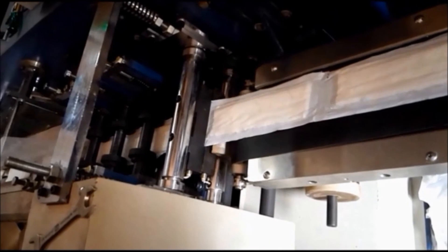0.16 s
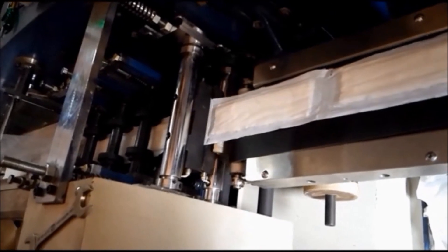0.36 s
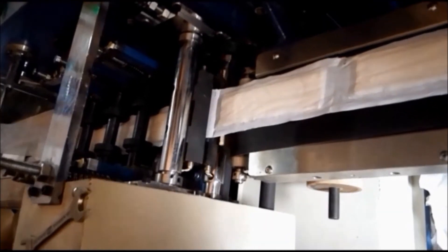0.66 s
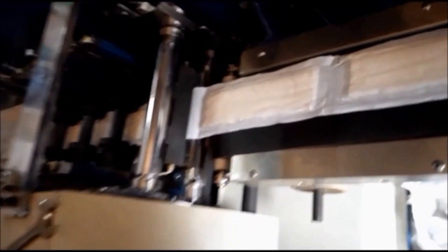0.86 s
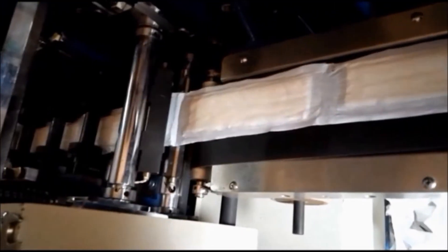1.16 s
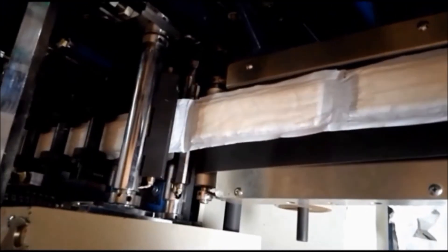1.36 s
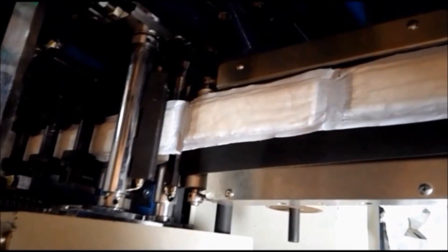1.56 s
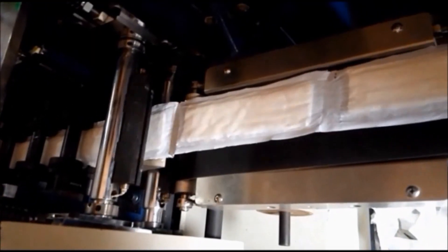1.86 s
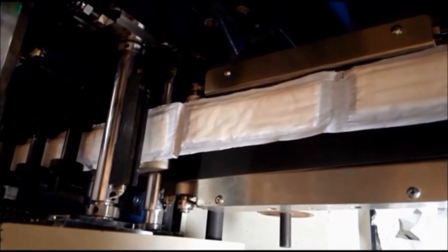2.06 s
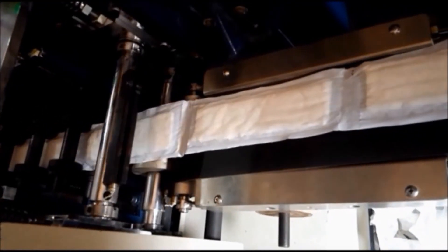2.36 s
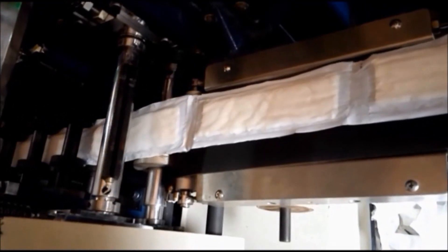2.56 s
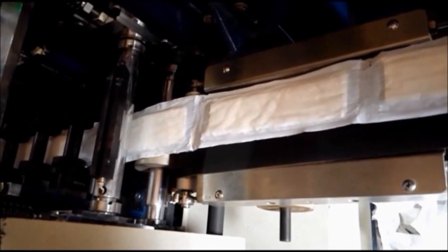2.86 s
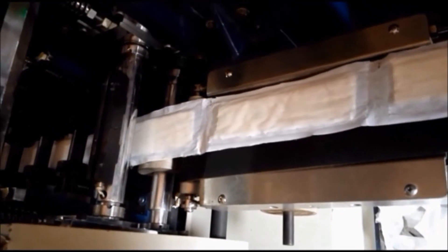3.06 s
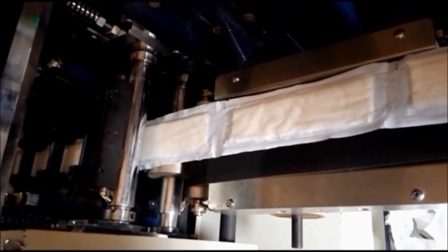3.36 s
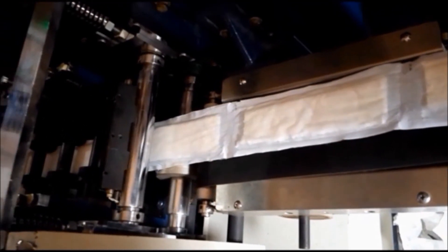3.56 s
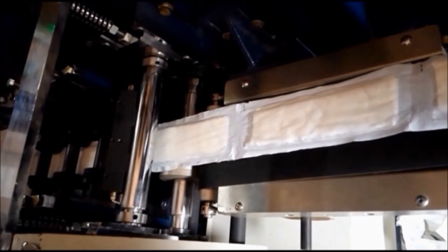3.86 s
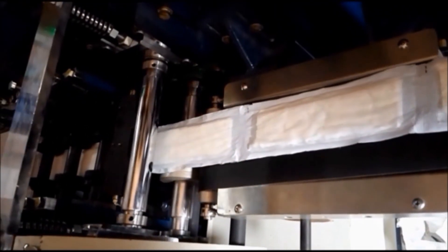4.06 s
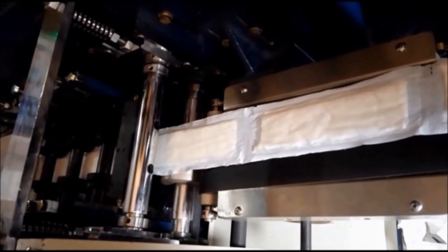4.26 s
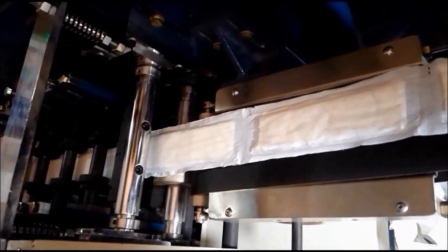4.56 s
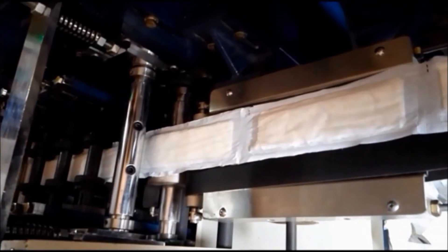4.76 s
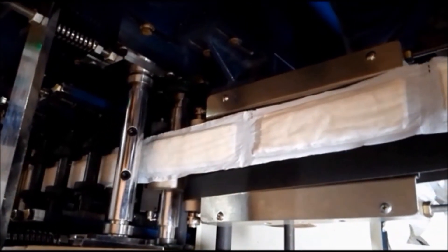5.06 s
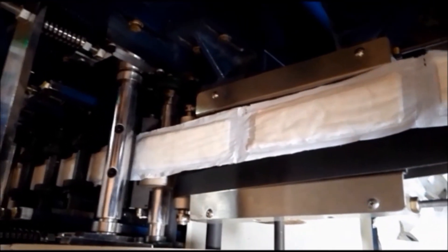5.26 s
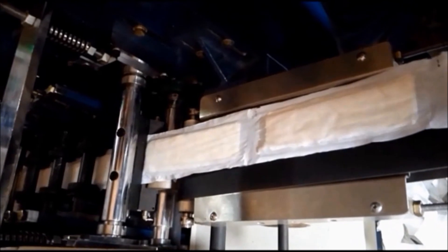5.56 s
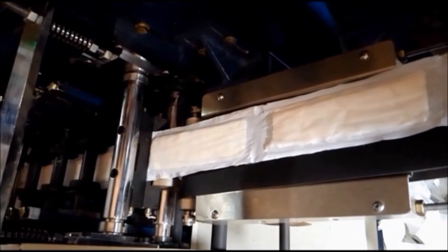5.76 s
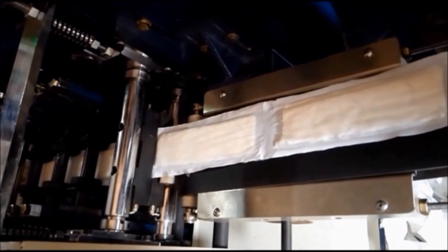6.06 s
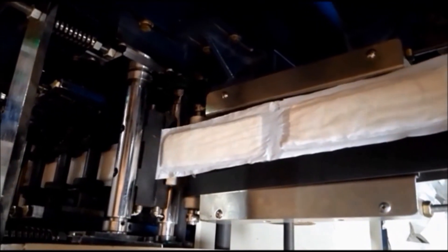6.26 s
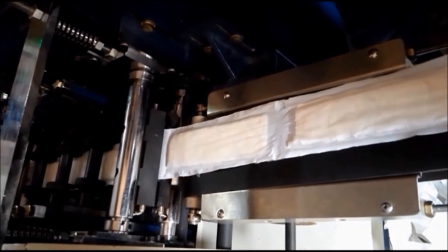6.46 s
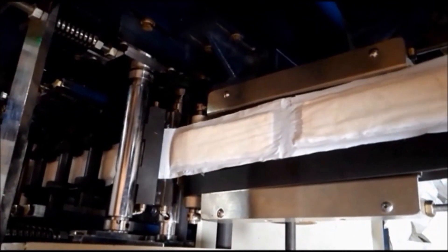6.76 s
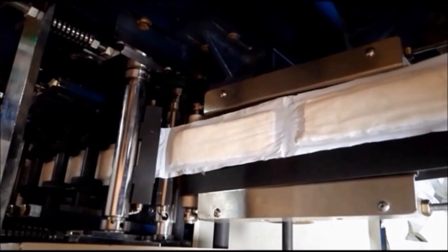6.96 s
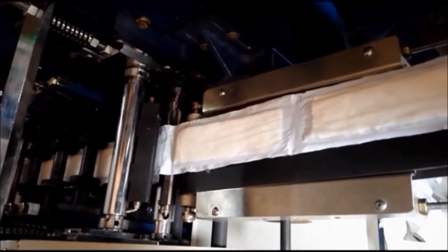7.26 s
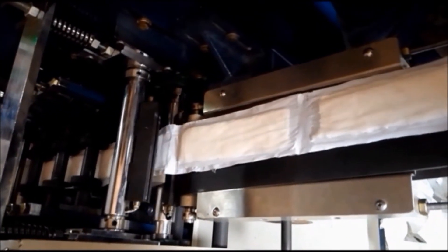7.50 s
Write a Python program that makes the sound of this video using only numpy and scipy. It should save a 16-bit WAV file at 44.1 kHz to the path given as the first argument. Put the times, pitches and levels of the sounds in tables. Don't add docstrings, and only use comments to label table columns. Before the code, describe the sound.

Loud, close pneumatic hisses ring off a steel frame in rhythm, above distant humming machinery and faint, thin bearing squeals.

```python
import sys
import numpy as np
from scipy import signal
from scipy.fft import rfft, irfft, next_fast_len
from scipy.io import wavfile
from scipy.ndimage import uniform_filter1d, map_coordinates

SR = 44100
rng = np.random.default_rng(int(sys.argv[2]) if len(sys.argv) > 2 else 0)


def ratio(d):
    e = np.asarray(d, float) / 20
    return 10 ** e


def bounce(signal):
    frames = np.transpose(np.atleast_2d(signal))
    limited = np.clip(frames, -1, 1)
    pcm = np.round(limited * 32767).astype(np.int16)
    wavfile.write(sys.argv[1], SR, pcm)


N = 336483


def unit(x):
    return x / np.sqrt(np.mean(x ** 2) + 1e-20)


def along(points, hz):
    f, v = np.transpose(points)
    return np.interp(np.log(hz + 1), np.log(f + 1), v)


def wobble(rate, size):
    knots = rng.standard_normal(int(size * rate / SR) + 4)
    return map_coordinates(knots, [np.arange(size) * rate / SR])


def noise(size, gain, channels=1):
    m = next_fast_len(size)
    spectrum = rfft(rng.standard_normal((channels, m)))
    return irfft(spectrum * gain(np.fft.rfftfreq(m, 1 / SR)), m)[:, :size]


def pair(size, gain, side):
    both = noise(size, lambda hz: gain(hz) * np.array([1 + 0 * hz, ratio(along(side, hz))]), channels=2)
    return both / np.std(both[0])


def wide(size, gain, side):
    mid, off = pair(size, gain, side)
    return np.array([mid + off, mid - off])


def patchy(x, patchy_db):
    z = signal.stft(x, nperseg=512)[2]
    field = uniform_filter1d(rng.standard_normal(z.shape[1:]), size=6, axis=0)
    field = uniform_filter1d(field, size=12, axis=1)
    return signal.istft(z * ratio(patchy_db * unit(field)), nperseg=512)[1][:, :x.shape[1]]


def echoes():
    # frequency in Hz, time to fall 60 dB in seconds
    room = [(150, 1.0), (500, 0.98), (1500, 0.86), (4000, 0.74), (9000, 0.56), (14000, 0.45)]
    # frequency in Hz, level in dB, time to fall 60 dB in seconds
    frame = [(320, -22, .4), (930, -17, .4), (3220, -22, .2), (3520, -23, .2), (5313, -16.5, .7),
             (5992, -19, .3), (7748, -17, .55), (8900, -20, .25), (9770, -20, .2), (10472, -13, .25),
             (10701, -15, .25), (11079, -19, .2)]
    hz, t, z = signal.stft(rng.standard_normal((2, SR)), SR, nperseg=256)
    decay = ratio(-60 * t / along(room, hz)[:, None])
    tail = signal.istft(z * decay, SR, nperseg=256)[1][:, :SR]
    t = np.arange(SR) / SR
    tail = tail * (1 - np.exp(-t / 0.0013))
    tail = tail / np.linalg.norm(tail[0])
    for mode_hz, db, t60 in frame:
        cycles = mode_hz * t + rng.random((2, 1))
        ring = ratio(-60 * t / t60) * np.sin(2 * np.pi * cycles + 1.2 * wobble(25, size=SR))
        port_db = db - 5 + rng.normal(0, 1.6, (2, 1))
        tail = tail + ratio(port_db) * ring / np.linalg.norm(ring[0])
    return tail


def valve():
    # start in seconds, hiss level in dB, extra edge near 4.5 kHz in dB,
    # time open in seconds, pressure loss in dB per second
    vents = [
        (-.2, -17, -3, 0.087, 52),
        (1.02, -12.5, 1, 0.06, 66),
        (1.638, -11, 1, 0.1, 64),
        (2.2727, -10, 5.5, 0.088, 72),
        (2.9389, -9.5, -1, 0.12, 46),
        (3.644, -8.5, 1.5, .12, 37),
        (4.2848, -8, 1, 0.12, 65),
        (4.931, -10, -1.5, 0.091, 26),
        (5.563, -10, 2, .11, 45),
        (6.4537, -14, 1.5, 0.16, 67),
    ]
    # frequency in Hz, level in dB per Hz
    jet_colour = [(60, -11), (170, -7.5), (320, -3), (480, -7.5), (900, 0.5), (1480, 3.5), (3100, -0.5),
                  (3900, -5), (5300, -2.5), (6600, -5), (7600, -1), (10900, 1), (11600, -6), (14200, -16.5)]
    # frequency in Hz, side minus mid in dB
    jet_side = [(60, -19), (200, -14), (370, -1), (670, 4), (1230, -3), (2300, 1.5), (4400, -1.5),
                (9000, -3), (14000, -4.5)]
    out = np.zeros((2, N + 3 * SR))
    t = np.arange(SR // 2) / SR
    upper = lambda hz: 1 / (1 + (3300 / (hz + 1)) ** 4)
    edge = lambda hz: np.exp(-(np.log((hz + 1) / 4500) / 0.92) ** 2)
    knot_hz = np.linspace(0, SR / 2, 60)
    for s, db, edge_db, open_s, loss_db in vents:
        body_db = -7.5 + 0.062 * loss_db
        uneven_db = rng.standard_normal(60)
        colour = lambda hz: ratio(along(jet_colour, hz) + edge_db * edge(hz) + np.interp(hz, knot_hz, uneven_db))
        shut = ratio(1.25 * wobble(38.6, size=len(t))) / (1 + np.exp(np.clip((t - open_s) / 0.059, -50, 50)))
        hiss = pair(len(t), lambda hz: colour(hz) * np.sqrt(upper(hz)), jet_side)
        hiss = hiss * ratio(-loss_db * t) * (1 - np.exp(-t / 0.0009))
        body = pair(len(t), lambda hz: colour(hz) * np.sqrt(1 - upper(hz)), jet_side)
        body = body * ratio(-0.8 * loss_db * t) * (1 - np.exp(-t / 0.01))
        jet = ratio(db) * shut * (hiss + ratio(body_db) * body)
        reflected = ratio(-4.5) * signal.fftconvolve(jet, echoes(), axes=1)
        direct = ratio(1.0) * np.pad(jet, ((0, 0), (0, SR - 1)))
        mid, side = reflected + direct
        out[:, SR + round(s * SR):][:, :len(mid)] += [mid + side, mid - side]
    return out[:, SR:SR + N]


def drone():
    # frequency in Hz, level in dB per Hz
    rumble = [(12, -33), (25, -6), (43, -6), (96, -3), (192, -5.5), (231, -5), (312, -2.5), (340, -6.5),
              (392, -7), (600, -22.5), (780, -48), (1320, -120)]
    # frequency in Hz, level in dB per Hz
    fan_hiss = [(240, -1.5), (400, -1.5), (520, -2), (700, -0.5), (950, 2.5), (1300, 3.5), (1900, 1),
                (3000, -3.5), (3900, -8), (10300, -9), (11400, -11), (11900, -16), (14200, -14),
                (14500, -60)]
    # frequency in Hz, side minus mid in dB
    drone_side = [(60, -27), (130, -16.5), (280, -9), (620, 4.5), (1340, -2.5), (2900, 1.5), (5000, -1),
                  (9000, -1), (14000, -1)]
    # frequency in Hz, width in Hz, level in dB re rumble
    motor = [(102.9, 6.1, -7), (243, 13, -16.5), (312.6, 10, -11.5)]
    # time in seconds, gain in dB
    slow_gain = [(0, 2), (.12, 1.5), (.95, 0.06), (2.2, 1.6), (2.9, -0.4), (4.25, -.3), (4.5, -5),
                 (7.63, -6)]
    carrier_hz, sway_hz = 12006.5, 17
    t = np.arange(N) / SR
    gain_db = np.interp(t, *np.transpose(slow_gain))
    low = patchy(wide(N, lambda hz: ratio(along(rumble, hz)), drone_side), patchy_db=0.4)
    for hum_hz, width_hz, db in motor:
        low = low + ratio(db) * unit(noise(N, lambda hz: 1 / (1 + (2 * (hz - hum_hz) / width_hz) ** 2)))
    high = patchy(wide(N, lambda hz: ratio(along(fan_hiss, hz)), drone_side), patchy_db=0.84)
    sway = 1.8 * np.sin(2 * np.pi * sway_hz * t)
    high = high + ratio(-17) * np.sin(2 * np.pi * carrier_hz * t + sway + np.array([[0], [1.4]]))
    low_db = -44 + gain_db + 0.45 * wobble(7.2, size=N)
    high_db = -36 + gain_db + 0.39 * wobble(11.0, size=N)
    return ratio(low_db) * low + ratio(high_db) * high


def squeals():
    # start in seconds, end in
    # seconds, row number in the table below, level in dB
    cries = [(2.57, 2.86, 0, -46), (3.35, 3.57, 0, -45.5), (4.95, 5.12, 1, -38.5), (5.1, 5.3, 1, -52),
             (2.66, 3.0, 2, -50), (3.1, 3.42, 2, -48.5), (4.5, 4.93, 2, -56), (2.75, 3.0, 4, -51),
             (3.28, 3.64, 3, -52), (3.96, 4.34, 3, -47), (5.2, 5.56, 3, -58), (5.8, 6.45, 3, -59.5)]
    # frequency in Hz,
    # left minus right in dB, third overtone in dB
    bearings = [(2095, 1, -60), (2390, 0, -60), (2882, 4, -60), (2965, 0, -10), (3330, 0, -60)]
    overtone_pan_db = 8
    out = np.zeros((2, N))
    sides = np.array([[.5], [-.5]])
    for start, end, bearing, db in cries:
        hz, pan_db, third_db = bearings[int(bearing)]
        size = int((end - start) * SR)
        phase = 2 * np.pi * np.cumsum(hz + 6 * wobble(27.7, size=size)) / SR
        level = ratio(db + 6 + 1.5 * wobble(18, size=size)) * signal.windows.tukey(size, .4)
        tone = np.sin(phase + sides) * ratio(pan_db * sides)
        third = np.sin(3 * phase + sides) * ratio(third_db + overtone_pan_db * sides)
        out[:, round(start * SR):][:, :size] += level * (tone + third)
    return out


def scene():
    return valve() + drone() + squeals()


def stereo_share(t):
    # start in seconds, share of bands left in stereo from 0 to 1, recovery in seconds
    lapses = [
        (0, 0, .47),
        (1.045, .04, .46),
        (1.66, 0, .72),
        (2.295, .05, .6),
        (2.96, .35, .4),
        (3.665, .45, .38),
        (4.955, .28, .36),
        (5.585, .15, .4),
    ]
    share = np.ones(len(t))
    for s, left, recovery_s in lapses:
        rise = left + (1 - left) * np.clip((t - s) / recovery_s, 0, 1) ** 2.2
        share = np.where(t >= s, rise, share)
    return share


def folded(x):
    # frequency in Hz, chance from 0 to 1 that the band is left out
    dropped = [(2300, .07), (6000, .05), (11000, .015), (11600, .15), (11900, .25), (11950, 0), (12060, 0),
               (12150, .35), (13200, .6), (13700, .85), (14250, .9), (14300, 1)]
    fold_hz, band_hz = 4600, 345
    hz, t, (mid, side) = signal.stft([x[0] + x[1], x[0] - x[1]], SR, nperseg=1024)
    band = (hz // band_hz).astype(int)
    bands = band[-1] + 1
    held = (np.arange(len(t)) + rng.integers(0, 6, (bands, 1))) // 6
    luck = np.take_along_axis(rng.random((bands, len(t))), held, axis=1)[band]
    mono = (luck > stereo_share(t)) & (hz[:, None] > fold_hz)
    gaps = rng.random((len(hz) // 3, len(t) // 10 + 1))
    gaps = np.repeat(np.repeat(gaps, 3, axis=0), 10, axis=1)[:, :len(t)]
    loud = np.sum(np.abs(mid) ** 2, axis=0) > ratio(-50)
    rarer = np.where(loud & (hz[:, None] > 11500), 2.5, 1)
    holes = gaps < along(dropped, hz)[:, None] ** rarer
    holes = holes & (hz[:, None] > np.where(loud, 2300, 11000))
    kept = ratio(-30 * holes)
    both = [mid * kept * ratio(2 * mono), side * kept * ~mono]
    mid, side = signal.istft(both, SR, nperseg=1024)[1][:, :N] / 2
    return np.array([mid + side, mid - side])


def top_cut(x):
    return signal.sosfilt(signal.butter(12, 14430, fs=SR, output="sos"), x)


def record(dry):
    # frequency in Hz, left minus right in dB
    ports = [(60, 0.5), (110, 0), (200, 0), (370, 0), (670, 4.5), (1230, -0.5), (2260, -1.5), (4130, 4),
             (7560, 2), (13800, -3.5)]
    m = next_fast_len(N)
    lean_db = along(ports, np.fft.rfftfreq(m, 1 / SR)) / 2
    x = irfft(rfft(dry, m) * ratio(np.array([lean_db, -lean_db])), m)[:, :N]
    x = x / (1 + np.abs(x) ** 8) ** (1 / 8)
    return top_cut(folded(x))


dry = scene()
out = record(dry)
bounce(out)
```